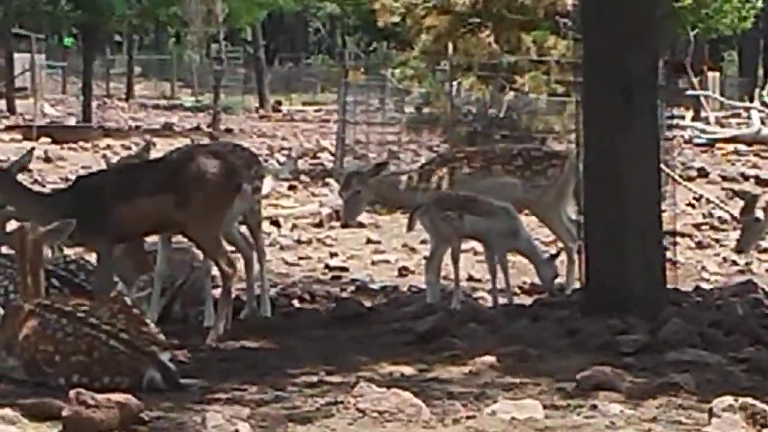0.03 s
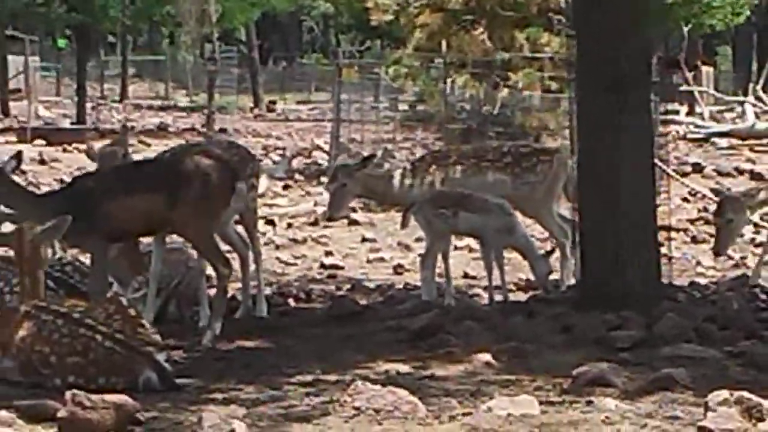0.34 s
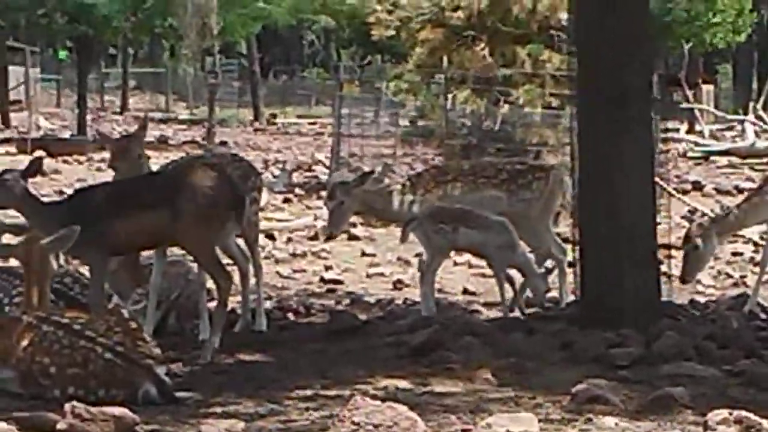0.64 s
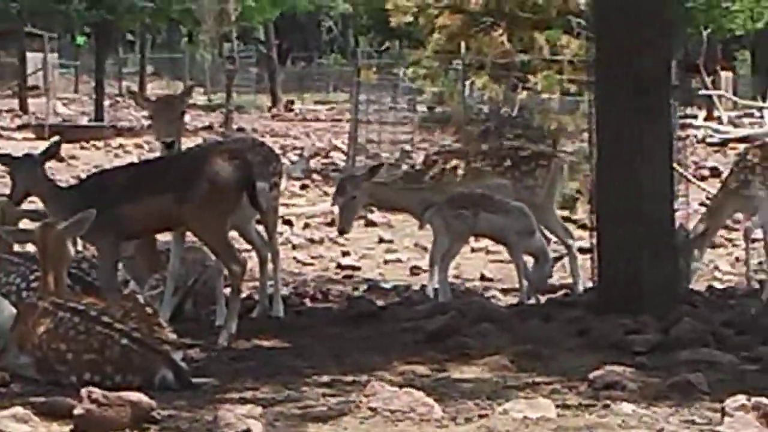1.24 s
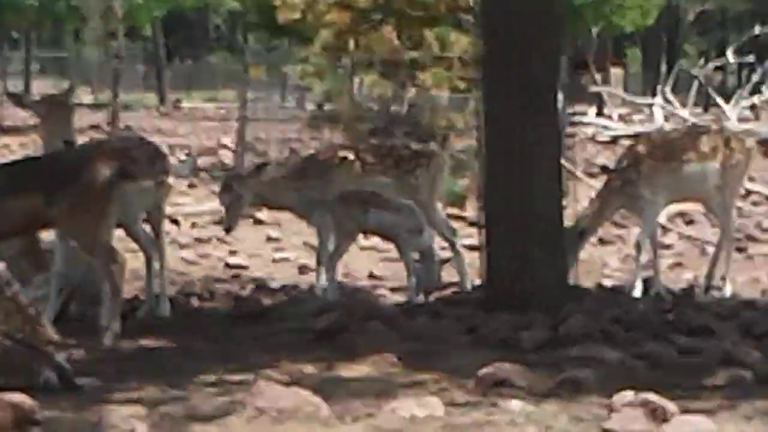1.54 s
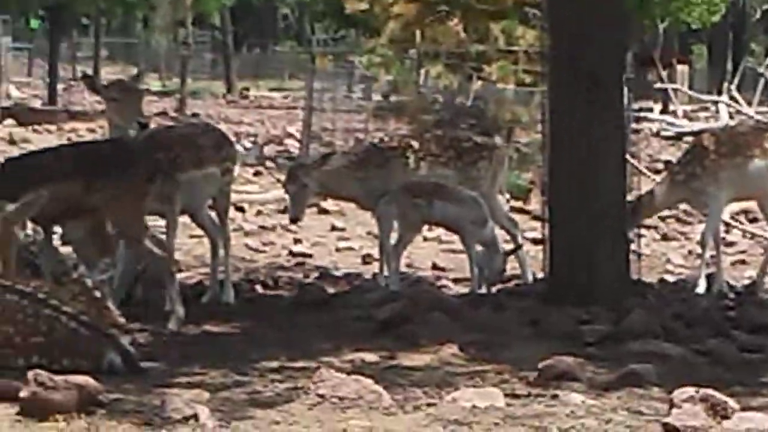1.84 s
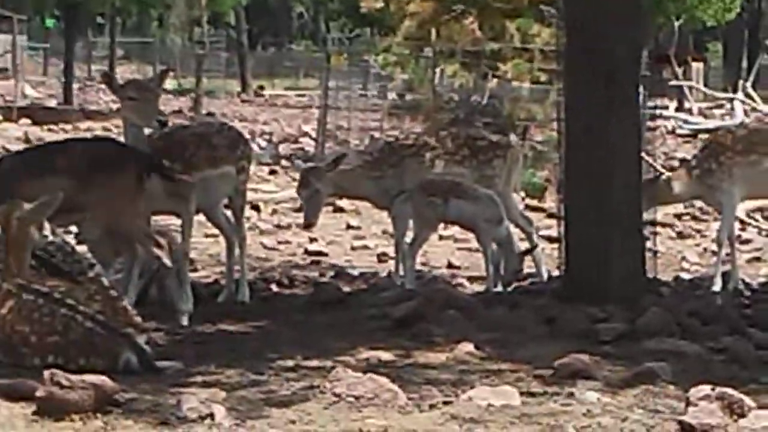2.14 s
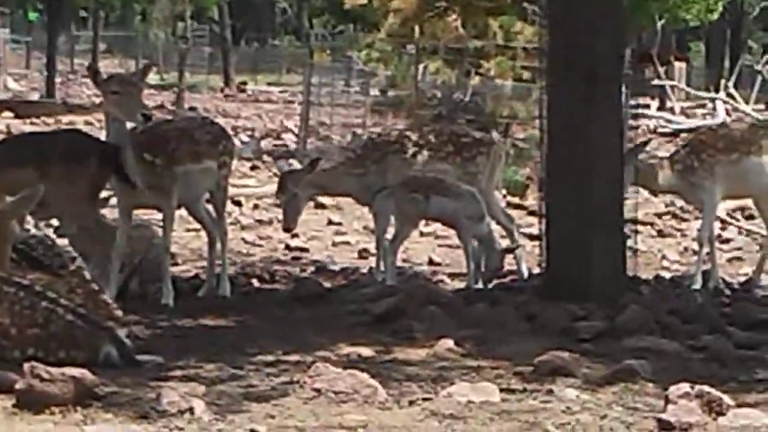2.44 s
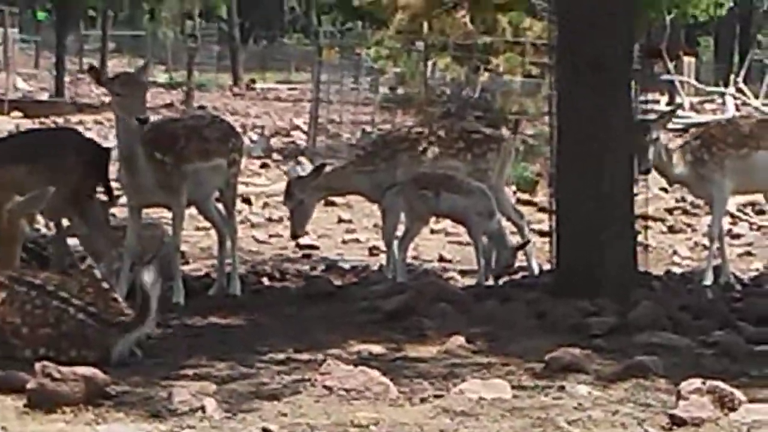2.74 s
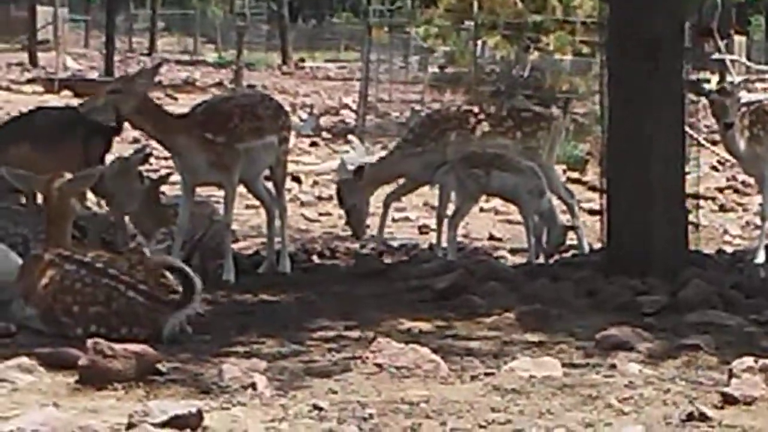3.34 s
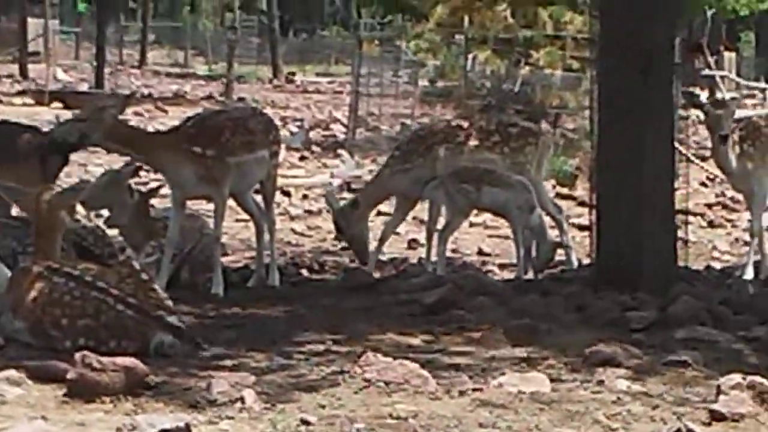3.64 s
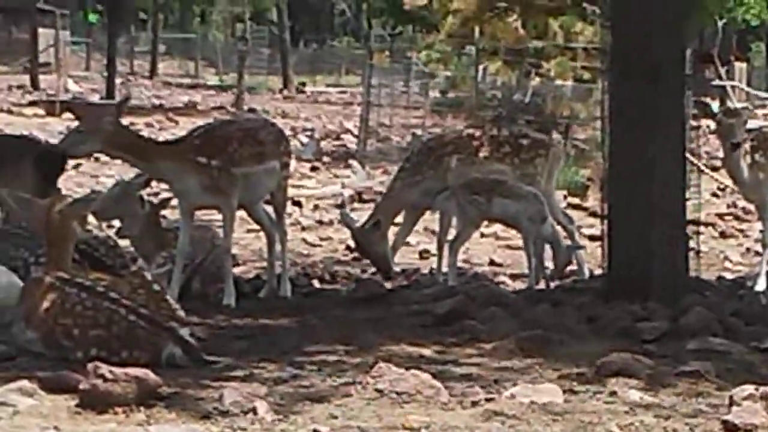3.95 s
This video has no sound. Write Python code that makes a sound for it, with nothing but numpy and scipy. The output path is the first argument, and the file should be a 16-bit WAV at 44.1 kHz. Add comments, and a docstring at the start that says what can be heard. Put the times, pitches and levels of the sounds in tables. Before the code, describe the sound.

Deer give thin, hoarse, overlapping bleats across a wooded enclosure, echoing slightly, while a small bird chirps briefly. Wind rumbles on the microphone, lightly at first, then in hard, much louder gusts near the end.

```python
"""Thin, arching, overlapping deer bleats carry across a wooded enclosure, and a small bird chirps.
Each bleat is a hoarse harmonic tone shaped by the throat; the bird sings with both sides of its syrinx.
The trunks echo both, along with faint scuffs on the dry ground. Gusts buffet the microphone, lightly
at first and hard near the end. Behind it all lie hissing treetops, distant air, the microphone's
own hiss and a faint camera whine."""
import sys
import numpy as np
from scipy import signal
from scipy.fft import rfft, irfft, next_fast_len
from scipy.io import wavfile
from scipy.ndimage import uniform_filter1d, minimum_filter1d, map_coordinates

SR = 44100
rng = np.random.default_rng(int(sys.argv[2]) if len(sys.argv) > 2 else 0)


def digitize_waveform(pressure):
    """Quantize a signal to 16-bit integers and store it at the path in sys.argv[1].

    Rows of a 2-D input are taken as channels; values are limited to [-1, 1].
    """
    field = np.atleast_2d(pressure).T
    bounded = np.clip(field, -1, 1)
    quanta = np.round(bounded * 32767).astype(np.int16)
    wavfile.write(sys.argv[1], SR, quanta)


N = 176400

# Deer across the enclosure. Each row: overtone tilt in dB per octave, hoarse share, echo send in dB,
# then a contour whose points give time in seconds, pitch in Hz, relative level in dB.
DEER_CALLS = [(-2, 0.64, -1.5, [(-.02, 900, -29), (.005, 811, -46), (.035, 585, -53.5)]),
              (-24, 0.43, 4.5, [(.12, 820, -61.5), (.2, 892.4, -58.5), (.42, 905, -52), (.56, 869, -56),
              (.64, 800, -57.5)]), (16, 0.67, -1.5, [(.235, 765, -69), (.3, 817, -60.5), (.45, 840.5, -58),
              (.51, 756, -59), (.555, 588, -58.5)]), (-14, 0.47, 1.5, [(.24, 604, -70), (.29, 688, -56.5),
              (.36, 613, -66), (.49, 612, -74)]), (21.5, 0.78, 7.5, [(.36, 785, -68), (.45, 814, -65.5),
              (.58, 780, -64.5)]), (-20, 0.53, 2, [(.8, 319, -47), (.9, 402.4, -42)]),
              (-23, 0.23, 0, [(.86, 788.5, -69), (.92, 921, -56.5), (1.03, 922.4, -57), (1.28, 929, -55),
              (1.46, 896, -60)]), (-1, .28, -8, [(1.04, 769, -66), (1.072, 869, -60), (1.09, 900, -46),
              (1.13, 906, -42.5), (1.205, 931.6, -44.5), (1.23, 917, -48.5), (1.32, 895, -46.5),
              (1.36, 849, -47), (1.43, 812, -50), (1.475, 668, -58.5)]), (-1.5, .6, 3, [(2.95, 690, -67.5),
              (3.04, 751, -69.5), (3.135, 724, -59)])]
# Resonances of the deer's throat. Each row: frequency in Hz, gain in dB.
THROAT_GAIN = [(600, -16.5), (820, -15.5), (930, -3), (1250, 1), (1650, 1.5), (1850, -5.5), (2200, -13),
               (2450, -10), (2750, -15.5), (3600, -22.5), (4200, -19.5), (4650, -14), (5100, -46),
               (5600, -12), (6500, -38)]
# The bird. Each row: start in seconds, length in seconds, top pitch in Hz, level in dB,
# arch depth as a share of the pitch, upper voice in dB against the lower.
BIRD_NOTES = [(.429, 0.03, 2380, -54, .08, -14), (0.534, 0.035, 4850, -46.5, .1, -10),
              (0.552, .105, 3217, -50.5, .26, 2), (.671, 0.029, 4700, -64, 0.078, -4),
              (2.668, 0.0077, 3100, -59.5, 0.078, -3), (2.732, 0.038, 5260, -63, 0.1, -2.5),
              (3.504, 0.044, 5040, -49, .1, -6), (3.525, 0.085, 3207, -48.5, .17, -12),
              (3.865, 0.095, 3730, -61, 0.38, -17.5)]
# Wind at the microphone. Each row: time in seconds, gust strength in dB.
GUSTS = [(0.6, -68), (0.66, -49.5), (0.73, -33.5), (0.78, -54.5), (0.86, -39), (0.99, -64.5), (1.27, -43.5),
         (1.49, -62), (1.53, -44.5), (1.6, -46), (1.94, -64.5), (2.02, -33.5), (2.07, -43.5), (2.09, -27),
         (2.17, -37.5), (2.19, -45), (2.40, -47), (2.47, -18.5), (2.6, -52), (2.73, -42), (2.98, -43),
         (3.02, -24.5), (3.11, -18.5), (3.19, -21.5), (3.29, -12.5), (3.37, -24.5), (3.49, -7), (3.53, -18),
         (3.64, -18.5), (3.82, -34), (3.88, -14), (3.92, -20.5), (3.94, -10.5), (3.96, -21), (4.0, -21.5)]
# The wind's low rumble and its small eddies. Each row: frequency in Hz, relative level in dB.
RUMBLE_SPECTRUM = [(22, -48), (40, -13.5), (65, -2.5), (85, -0.5), (160, -4), (260, -12), (480, -42),
                   (1000, -90)]
EDDY_SPECTRUM = [(100, -24.5), (220, 2), (330, 5), (500, -6), (750, -16.5), (1000, -28.5), (1500, -42.5),
                 (2500, -102)]
# Hard buffets right on the microphone. Each row: time in seconds, peak in dB, centre in Hz.
EDDY_HITS = [(0.725, -21, 108.5), (1.272, -20, 115), (1.531, -31, 79), (2.103, -20, 106),
             (2.16, -21.5, 81.4), (2.457, -12, 295), (2.479, -11.5, 89.3), (2.507, -18.5, 154),
             (2.763, -25, 116), (2.895, -25, 120), (3.066, -13.5, 280), (3.082, -13.5, 310),
             (3.122, -4.5, 166), (3.214, -10, 182), (3.281, -5, 202), (3.32, -13, 373), (3.347, -17, 382),
             (3.401, -10.5, 367), (3.429, -9.5, 431), (3.473, -5, 342), (3.495, -5, 425), (3.51, -4, 252),
             (3.595, -9.5, 360), (3.626, -11, 260), (3.877, -8, 424), (3.892, -3.5, 216), (3.93, -9, 326),
             (3.944, -3.5, 131)]
# Scuffs on the ground. Each row: start in seconds, length in seconds, level in dB, centre in Hz.
GROUND_SCUFFS = [(1.581, 0.18, -62, 750), (1.82, 0.66, -78, 990), (2.381, 0.02, -59.5, 1850),
                 (2.45, 0.13, -69, 5900), (3.17, 0.077, -65.5, 6200)]
# Reverberation among the trees. Each row: frequency in Hz, seconds to fade by 60 dB.
WOODS_DECAY = [(300, 0.33), (1800, 0.78), (4000, 0.68)]
# Treetop hiss overhead. Each row: time in seconds, relative level in dB.
TREETOP_SWELL = [(0.0, -78), (1.35, -75), (1.54, -72), (1.8, -81.5), (2.08, -72.5), (2.4, -72),
                 (3.28, -65.5), (3.98, -67.5)]
# Treetops, distant air and microphone hiss. Each row: frequency in Hz, relative level in dB.
TREETOP_SPECTRUM = [(1000, -9.5), (2500, -6), (3800, -6), (5200, -1), (6500, 0), (7600, -8), (9500, -15),
                    (15800, -15)]
AIR_SPECTRUM = [(30, -13), (66, -4.5), (130, -18.5), (230, -6), (350, -14.5), (520, -21), (950, -18),
                (1200, -25), (2500, -31.5), (9500, -52)]
MIC_HISS_SPECTRUM = [(9500, -13), (12800, 3)]


def deer_bleats(partials=6, jitter=.004, tremor_hz=140, rasp_hz=160, edge_s=.011):
    """Hoarse harmonics pass fixed throat resonances; returns the direct sound and the echo send."""
    full_pitch_hz, dulling_db = 983, 47.5  # a strained voice is bright; tilt lost per octave below it
    out, t = np.zeros((2, N)), clock()
    for tilt_db, hoarse, echo_db, contour in DEER_CALLS:
        times, pitch, db = np.transpose(contour)
        on = (t > times[0]) & (t < times[-1])
        age = t[on] - times[0]
        hz = np.interp(t[on], times, pitch) * (1 + jitter * wobble(tremor_hz)[on])
        phase = 2 * np.pi * np.cumsum(hz) / SR
        slope_db = tilt_db - dulling_db * np.log2(full_pitch_hz / hz).clip(0)
        level = amp(np.interp(t[on], times, db)) * gate(age, times[-1] - times[0], edge_s)
        rough = np.minimum(hoarse * (pitch.max() / hz) ** 4, 1)  # hoarser as the pitch sags
        for k in range(1, partials + 1):
            knots = rng.standard_normal((2, 500))
            in_step, across = (map_coordinates(row, [age * rasp_hz]) for row in knots)
            partial = (1 + rough * in_step) * np.sin(k * phase) + rough * across * np.cos(k * phase)
            colour_db = along(THROAT_GAIN, k * hz) + slope_db * np.log2(max(k / 2, 1))
            waver_db = wobble(13.02)[on]  # each partial swells and fades on its own
            voice = level * amp(colour_db + waver_db) * partial
            out[:, on] += [voice, amp(echo_db) * voice]
    return out


def bird_chirps(upper_ratio=1.105, rasp_fade_s=.078):
    """The two sides of the syrinx sound arched notes at a fixed pitch ratio."""
    out, t = np.zeros(N), clock()
    for start, length, top_hz, db, arch, upper_db in BIRD_NOTES:
        rasp = .056 * np.exp(-length / rasp_fade_s)  # longer notes are purer
        on = (t > start) & (t < start + length)
        progress = (t[on] - start) / length
        hz = top_hz * (1 - arch * (2 * progress - 1) ** 2 + rasp * wobble(900)[on])
        phase = 2 * np.pi * np.cumsum(hz) / SR
        swell = np.sin(np.pi * progress)
        upper_voice = amp(upper_db) * swell ** 2 * np.sin(upper_ratio * phase)
        out[on] += amp(db) * swell * (np.sin(phase) + upper_voice)
    return out


def wind_on_microphone(strong_db=-8.5, eddy_growth=1.35):
    """Gusts drive a low rumble and lumpy eddies, which gain on the rumble as the wind rises."""
    gust_db = curve(GUSTS)
    rumble = amp(gust_db - .5 + 2.78 * wobble(60)) * turbulence(RUMBLE_SPECTRUM, even_s=.13)
    eddies = unit(amp(5.7 * wobble(110)) * turbulence(EDDY_SPECTRUM, even_s=.039))
    eddy_db = strong_db - 10.5 + eddy_growth * (gust_db - strong_db)
    return rumble + amp(eddy_db) * eddies


def turbulence(spectrum, even_s):
    """Noise with its slow swings evened out, so that the gust can set its level."""
    x = noise(spectrum)
    window = signal.windows.hann(int(even_s * SR))
    power = np.abs(signal.fftconvolve(x * x, window / window.sum(), "same"))
    return unit(x / np.sqrt(power + 1e-3))


def buffets():
    """An eddy hitting the microphone port is one push of pressure with a suck on either side."""
    out = np.zeros(N)
    for time, db, hz in EDDY_HITS:
        spread = np.minimum((np.pi * hz * (clock() - time)) ** 2, 50)
        out += amp(db) * (1 - 2 * spread) * np.exp(-spread)
    return out


def scuffs(width_octaves=.63):
    """Dry ground rustles in brief, grainy swells of noise."""
    out = np.zeros(N)
    for start, length, db, centre in GROUND_SCUFFS:
        band = lambda hz: np.exp(-.5 * (np.log2((hz + 1) / centre) / width_octaves) ** 2)
        grit = unit(filtered(rng.standard_normal(N), band))
        out += amp(db + 3.8 * wobble(90)) * gate(clock() - start, length, length / 2) * grit
    return out


def woods_echo(x, trunks=12, trunks_db=-8.5, latest_s=.04, tail_db=-9.5):
    """Nearby trunks throw back single echoes, and the woods add a diffuse tail."""
    hz, t, bands = signal.stft(rng.standard_normal(SR), SR, nperseg=256)
    decay = amp(-60 * t / along(WOODS_DECAY, hz)[:, None])
    tail = signal.istft(bands * decay, SR, nperseg=256)[1]
    response = amp(tail_db) * tail / np.linalg.norm(tail)
    delays = (rng.uniform(.1, 1, trunks) * latest_s * SR).astype(int)
    response[delays] += amp(trunks_db) / np.sqrt(trunks)
    return signal.fftconvolve(x, response)[:N]


def treetops(gain_db=5.5):
    """Wind hisses through the needles overhead."""
    return amp(curve(TREETOP_SWELL) + gain_db + .6 * wobble(6.8)) * noise(TREETOP_SPECTRUM)


def distant_air(db=-58):
    """A low, wavering wash from far off."""
    return amp(db + 2.2 * wobble(7.37)) * noise(AIR_SPECTRUM)


def equipment_noise(hiss_db=-72.5, whine_db=-78, whine_hz=14002, pulse_hz=12):
    """The microphone hisses steadily and the camera adds a faint, pulsing whine."""
    pulsing = np.clip(.5 + 2 * np.sin(2 * np.pi * pulse_hz * clock()), 0, 1)
    whine = amp(whine_db) * np.sqrt(2) * pulsing * np.sin(2 * np.pi * whine_hz * clock())
    return amp(hiss_db) * noise(MIC_HISS_SPECTRUM) + whine


def amp(db):
    return 10 ** (np.asarray(db) / 20)


def unit(x):
    """Scale to rms 1."""
    return x / np.sqrt(np.mean(x ** 2) + 1e-20)


def along(points, hz):
    """Interpolate (Hz, value) points on a log frequency axis."""
    freqs, values = np.transpose(points)
    return np.interp(np.log(hz + 1), np.log(freqs + 1), values)


def clock():
    return np.arange(N) / SR


def curve(points):
    """Interpolate (seconds, value) points at every sample."""
    return np.interp(clock(), *np.transpose(points))


def wobble(rate):
    """A smooth random curve with `rate` knots a second."""
    return map_coordinates(rng.standard_normal(N // 4), [clock() * rate], mode="wrap")


def filtered(x, response):
    """Apply a gain given as a function of Hz."""
    size = next_fast_len(N + SR // 2)
    return irfft(rfft(x, size) * response(np.fft.rfftfreq(size, 1 / SR)), size)[:N]


def noise(spectrum):
    """Coloured noise of rms 1."""
    return unit(filtered(rng.standard_normal(N), lambda hz: amp(along(spectrum, hz))))


def gate(t, length, edge_s):
    """Smooth rise, hold and fall."""
    rise = np.sin(np.pi / 2 * np.clip(t / edge_s, 0, 1))
    fall = np.sin(np.pi / 2 * np.clip((length - t) / edge_s, 0, 1))
    return rise * fall


def scene():
    """The enclosure from one microphone standing in the wind."""
    bleats, bleats_to_trunks = deer_bleats()
    small_sounds = bird_chirps() + scuffs()
    echo = woods_echo(bleats_to_trunks + small_sounds)
    wind = wind_on_microphone() + buffets()
    background = treetops() + distant_air() + equipment_noise()
    return (bleats + small_sounds + echo + wind + background)[None]


def record(dry, low_cut_hz=42.3, ceiling=.95, look_ahead_s=.006, top_hz=15750):
    """The microphone sheds deep bass, a limiter holds the hardest buffets, and the top treble is cut."""
    x = filtered(dry[0], lambda hz: hz ** 4 / np.hypot(hz ** 4, low_cut_hz ** 4))
    size = int(look_ahead_s * SR)
    safe_gain = ceiling / np.maximum(np.abs(x), ceiling)
    gain = uniform_filter1d(minimum_filter1d(safe_gain, 2 * size), size)
    return filtered(x * gain, lambda hz: hz < top_hz)[None]


dry = scene()
out = record(dry)
digitize_waveform(out)
```